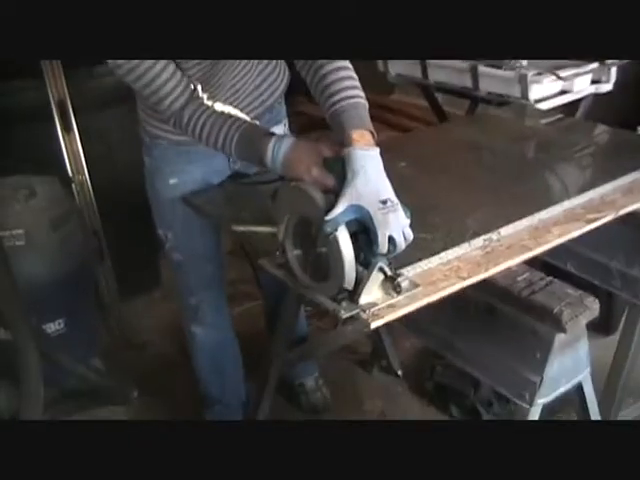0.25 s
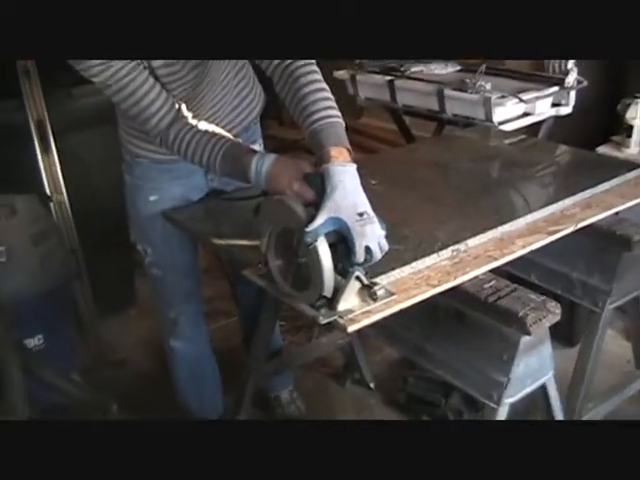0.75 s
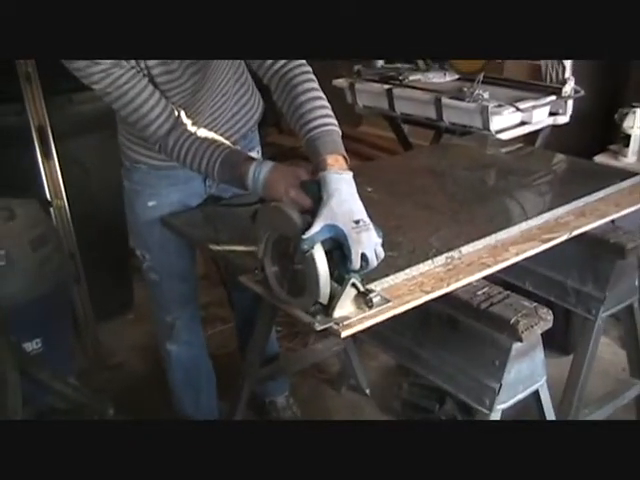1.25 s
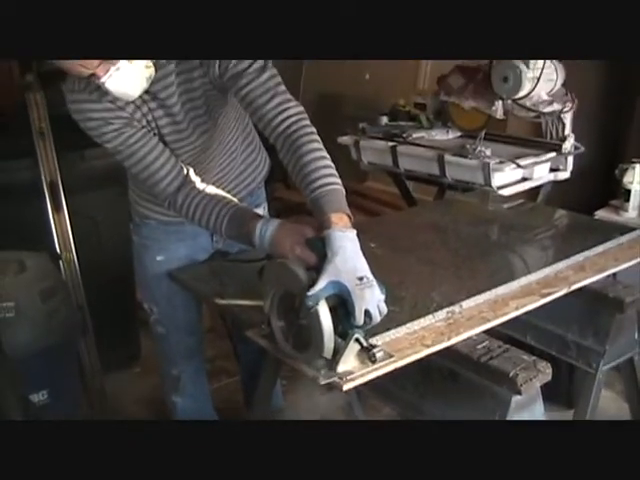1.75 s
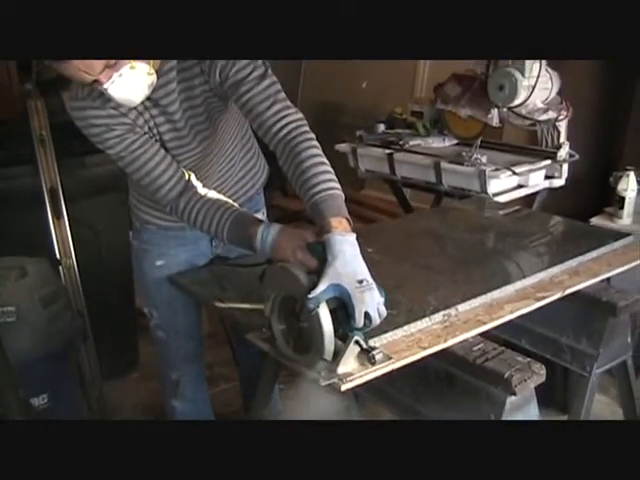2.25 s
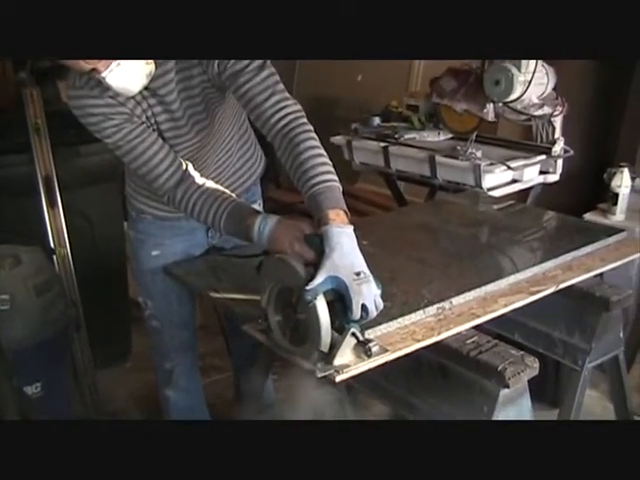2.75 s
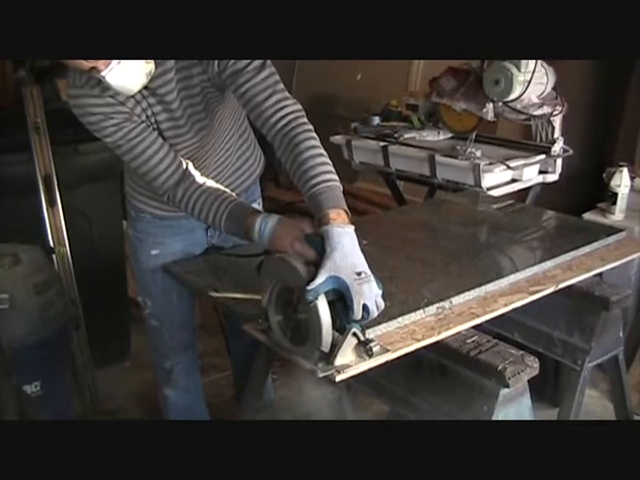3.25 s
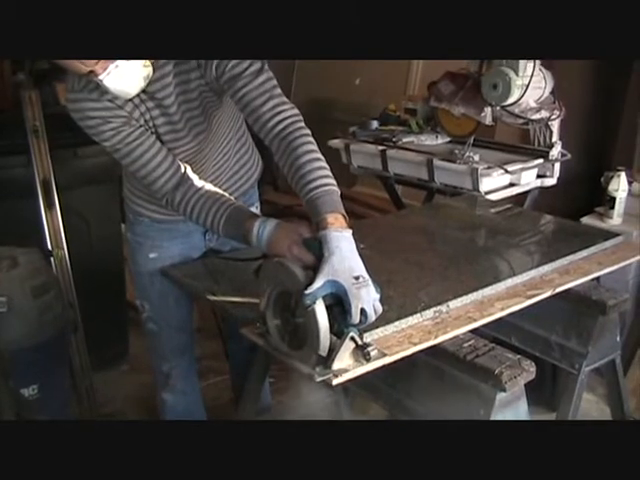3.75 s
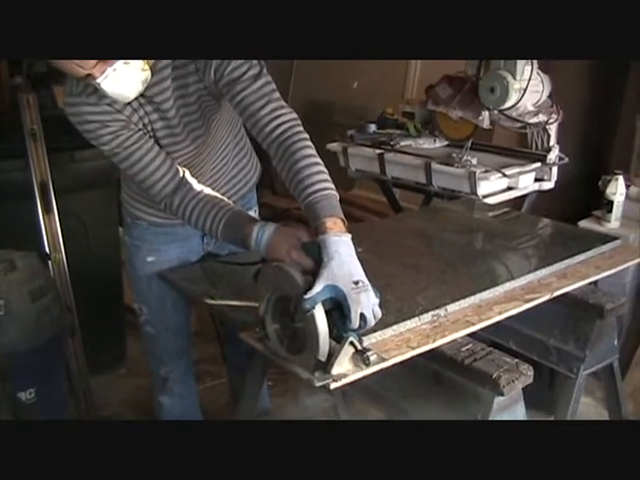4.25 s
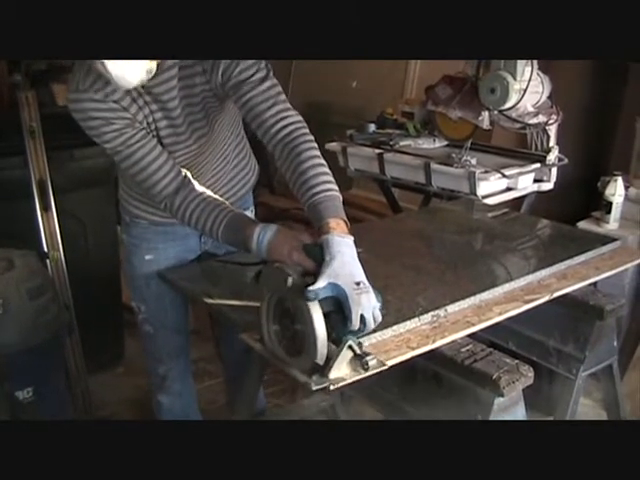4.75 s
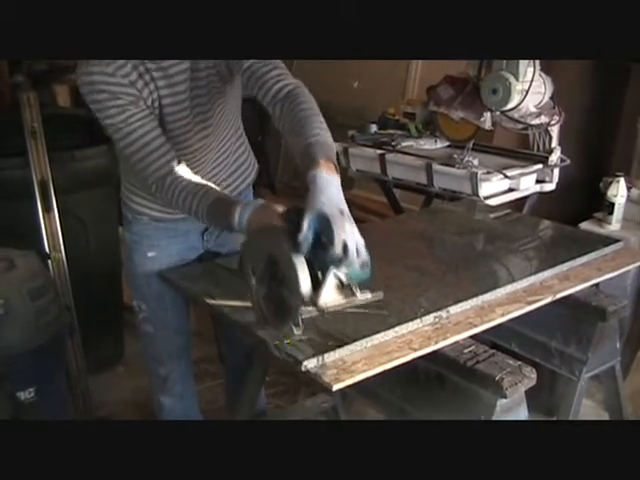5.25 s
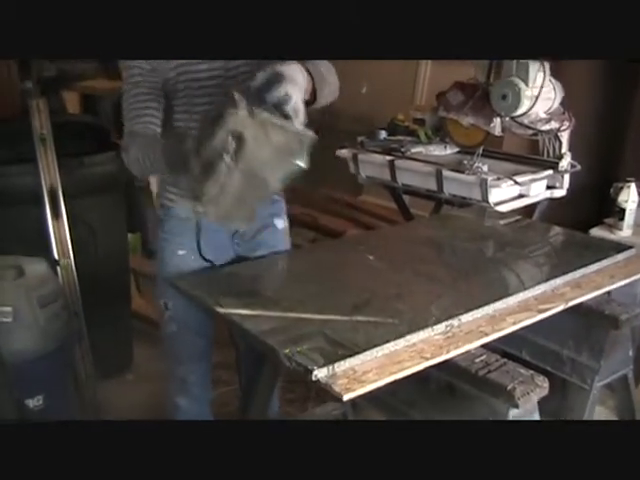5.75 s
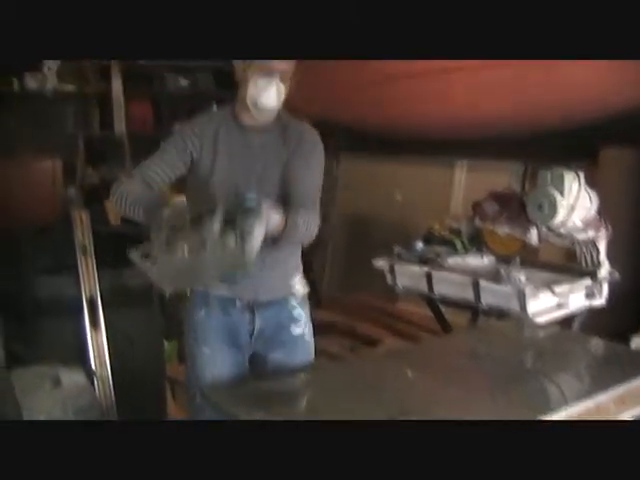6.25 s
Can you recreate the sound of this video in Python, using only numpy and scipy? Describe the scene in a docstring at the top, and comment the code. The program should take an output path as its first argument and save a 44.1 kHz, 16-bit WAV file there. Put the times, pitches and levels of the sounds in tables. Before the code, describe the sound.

In a small workshop, a handheld circular saw jerks on with a growl and a fast-rising whine. Almost at once the rim chips a stone slab, screeches briefly, and settles into a loud, hissing, metallic grind with fluttering rubbing tones. After more than four seconds it breaks through with a couple of knocks, and the motor whine and fan air slide downward. Close, level-controlled stereo pickup.

```python
"""A handheld circular saw spins up, cuts a stone slab for just over four seconds, then coasts down.
The motor whines at multiples of its speed over rushing fan air; grit rings the steel blade, and high
spots on the rim rub the slab in the same order on every turn. Chips, a short screech and knocks mark
the start and end of the cut. A small workshop adds diffuse reflections, and the recorder's gain control
turns the whole sound down while it is loud, so the motor drops back behind the cut."""
import sys
import numpy as np
from scipy import signal
from scipy.fft import rfft, irfft, next_fast_len
from scipy.io import wavfile
from scipy.ndimage import uniform_filter1d

SR = 44100
rng = np.random.default_rng(int(sys.argv[2]) if len(sys.argv) > 2 else 0)


def unload_wav(signal):
    """Save mono or channel-first audio to the path in sys.argv[1] as 16-bit WAV at rate SR, clipped to [-1, 1]."""
    wavfile.write(
        sys.argv[1],
        SR,
        np.round(np.clip(np.atleast_2d(signal).T, -1, 1) * 32767).astype(np.int16),
    )


N = 287532  # samples, about 6.5 seconds
TIME = np.arange(N) / SR
SIZE = 2 * next_fast_len(N * 5 // 8)  # transform length, with spare room for ringing
FREQ = np.maximum(np.arange(SIZE // 2 + 1) * SR / SIZE, 1)  # Hz

FREE_HZ = 382.5  # motor turns per second without load
GEAR_RATIO = 4.335  # motor turns for one turn of the blade
HUM_HZ = 120  # twice the mains frequency
BITE_S = .25  # the rim touches the stone

# Leaning on the saw slows the motor. Each row: time in seconds, speed lost in motor turns per second.
SPEED_LOSS = [(1.89, 0), (2.53, 13.1), (2.84, 12.5), (3.23, 8.9), (4.42, 5.6)]


def saw(speed, turns):
    """Everything that sounds at the slab; the motor drives the blade through a reduction gear."""
    # The rim chips the edge as it enters.
    # Each row: start in seconds, starting level in dB, decay in seconds, centre of the crack in Hz.
    chips = [(.256, -11, .02, 12000), (.272, -11.5, .018, 8000), (.344, -14, .015, 11500)]
    # The blade sings briefly as it wedges into the fresh slot.
    # Each row: start in seconds, starting level in dB, decay in seconds, pitch in Hz.
    screech = [(.33, -22.5, 0.24, 4060), (.35, -35, 0.17, 3740)]
    # The saw's shoe knocks on the slab.
    # Each row: start in seconds, starting level in dB, decay in seconds, centre of the thud in Hz.
    knocks = [(4.827, -10.5, 0.0098, 760), (4.85, -18.5, 0.037, 534), (5.085, -30, 0.031, 192),
              (5.145, -41, 0.082, 199)]
    blade_turns = turns / GEAR_RATIO
    cut = grinding(blade_turns) + rubbing(blade_turns) + drone(turns)
    entry = blows(chips, width=0.55) + blows(screech, width=0.006)
    return motor(speed, turns) + start_up() + entry + cut + blows(knocks, width=1.2)


def motor_speed():
    """Turns per second: spin-up towards free speed, slowing under load, coasting after switch-off."""
    start_hz, spin_up_s = 200.7, .476
    switch_off_s, coast_s = 4.42, 3.93
    driven_s = np.minimum(TIME, switch_off_s)
    free_running = FREE_HZ - (FREE_HZ - start_hz) * np.exp(-driven_s / spin_up_s)
    driven = free_running - curves(SPEED_LOSS)[0]
    return driven * np.exp(-(TIME - driven_s) / coast_s)


def motor(speed, turns):
    """Fan air, and whines locked to the shaft that swell in resonances and are blurred by eddies."""
    # Resonances that the fan whine and its octave sweep through.
    # Each row: centre in Hz, width in Hz, level in dB.
    fan_peaks = [(2030, 120, 1), (2280, 170, -1), (2500, 220, 1.5), (2970, 160, -.5), (4170, 130, -3),
                 (4580, 330, -3), (5560, 230, 4), (6000, 450, -3)]
    # Resonances that the gear whine sweeps through. Each row: centre in Hz, width in Hz, level in dB.
    gear_peaks = [(3100, 400, -9), (3650, 170, -1), (4000, 260, -1.5), (4400, 400, 0)]
    # Weaker motor tones. Each row: multiple of the motor speed, level in dB against the fan air.
    weak_tones = [(1, -35.5), (2, -22), (3, -40), (6, -53), (8, -37), (10, -14), (15, -38), (24, -32),
                  (27, -25)]
    fan_order, gear_order = 9, 12  # fan blades and pinion teeth set these multiples of the motor speed
    octave_order = 2 * fan_order

    # Octaves above (or below) free speed; each octave changes the air's level, rumble and hiss.
    octaves = np.log2(speed / FREE_HZ)
    air_db = -17 + .5 * octaves
    rumble_db = 1.5 * octaves
    hiss_db = 2 + 8.5 * octaves
    air = fan(air_db, rumble_db, hiss_db)

    # Blade wobble makes the fan whine rise and fall twice per blade turn, which adds sidebands.
    wobble = 1 + 0.33 * np.sin(2 * np.pi * 2 * turns / GEAR_RATIO)
    fan_tone = tone(turns, fan_order, flutter=.5) * wobble
    fan_tone = fan_tone + undb(-4) * around(turns, fan_order, width_hz=520)
    octave_tone = tone(turns, octave_order, flutter=1.0) * wobble
    octave_tone = octave_tone + undb(1) * around(turns, octave_order, width_hz=510)
    gear_tone = tone(turns, gear_order, flutter=.15) + undb(-15) * around(turns, gear_order, width_hz=380)

    fan_gain, octave_gain, gear_gain = whine_levels()
    swell = undb(1.4 * walk(14))  # the saw moves in the hands
    fan_whine = fan_tone * fan_gain * swell * resonances(fan_peaks, fan_order * speed, order=2)
    octave_whine = octave_tone * octave_gain * resonances(fan_peaks, octave_order * speed, order=2)
    gear_whine = gear_tone * gear_gain * resonances(gear_peaks, gear_order * speed, order=2)
    weak = sum(undb(db) * tone(turns, multiple, flutter=0.96) for multiple, db in weak_tones)
    return air + fan_whine + octave_whine + gear_whine + weak * undb(air_db)


def whine_levels():
    """Gain of the fan whine, its octave and the gear whine, before their resonances."""
    # Stages of the work: first jerk, spin-up, in the stone, running free. Each row: start in seconds,
    # fan whine in dB, its octave in dB, gear whine in dB.
    stages = [(0, -35, -42, -22), (.15, -22.5, -42, -11.5), (.28, -35, -39, -23.5), (4.67, -21.5, -27, -24)]
    fade_s = 0.062
    starts, *levels = np.transpose(stages)
    stage = np.searchsorted(starts[1:], TIME)
    return [undb(uniform_filter1d(db[stage], int(fade_s * SR))) for db in levels]


def fan(air_db, rumble_db, hiss_db):
    """Cooling air rushes through the housing, with a low rumble and a bright hiss."""
    # Colour of the rushing air. Each row: frequency in Hz, level in dB.
    air_colour = [(40, -46), (90, -31.5), (180, -26.5), (350, -12.5), (520, -6.5), (750, -4), (1100, -2.5),
                  (1600, -2.5), (3200, 1), (4800, -6), (6000, -5), (9000, -7), (12000, -14.5), (15500, -19)]
    # Resonances of the housing. Each row: centre in Hz, width in Hz, level in dB.
    housing = [(297, 40, -8), (552, 66, 1), (1067, 137, 2), (1700, 31, 0.5), (2505, 140, 1.5),
               (3012, 33, 8.5), (5600, 240, -1.5), (6200, 97, -0.5)]
    rush = unit(ring(rng.standard_normal(N), np.hypot(colour(air_colour), resonances(housing))))
    low = signal.sosfiltfilt(signal.butter(2, 800, fs=SR, output="sos"), rush)
    high = signal.sosfiltfilt(signal.butter(2, 4500, "high", fs=SR, output="sos"), rush)
    # Taking one from each gain leaves the band as it is at 0 dB.
    shaped = rush + low * (undb(rumble_db) - 1) + high * (undb(hiss_db) - 1)
    return shaped * undb(air_db + 0.65 * walk(16))


def start_up():
    """The motor current makes the windings hum at twice the mains frequency and the gears growl."""
    # Strength of the motor current. Each row: time in seconds, hum level in dB.
    current = [(0, -31.5), (.12, -33), (.2, -41), (.3, -57.5), (1.4, -50.5), (1.7, -62), (4.4, -68),
               (4.5, -90)]
    # Gears under starting torque. Each row: centre in Hz, width in Hz, level in dB.
    gears = [(700, 120, -6), (980, 90, -2), (1090, 80, 0), (1450, 90, -6)]
    phase = 2 * np.pi * HUM_HZ * TIME
    hum = unit(np.sin(phase) + undb(-3) * np.sin(2 * phase))
    rattle = unit(rng.standard_normal(N) * (1 + 0.36 * np.sin(phase)))
    growl = ring(rattle, resonances(gears) * resonances([(1010, 2500, 0)]))
    return (hum + undb(13.5) * growl) * undb(curves(current)[0])


def grinding(blade_turns):
    """Grit cracks off in dense clicks, pulsing with wobble and torque; it rings the blade and hisses."""
    # Ringing of the steel blade. Each row: centre in Hz, width in Hz, level in dB.
    blade = [(2258, 51, -7.4), (3060, 60, -3.5), (3399, 16, -4.1), (3742, 16, -3.0), (4032, 50, -5.8),
             (4480, 95, -7.7), (5021, 32, -3.9), (5664, 34, -4.5), (5929, 44, -5.0), (6129, 114, -5.5),
             (6469, 65, -7.7), (6818, 26, -6.7), (6932, 72, -4.9), (7353, 73, -0.8), (7786, 31, -6.0),
             (8368, 53, 0.0), (8691, 46, -0.5), (9086, 48, -4.5), (9764, 63, -5.8), (9890, 21, 0.6),
             (10108, 22, -0.4), (10488, 21, -8.5), (11505, 102, -9.1), (11915, 34, -9.7),
             (12081, 38, -12.1), (12386, 29, -9.1), (12580, 52, -10.8), (13220, 115, -6.3),
             (14223, 58, -11.9), (14936, 107, -12.8)]
    # Colour of the dust's hiss. Each row: frequency in Hz, level in dB.
    dust = [(500, -42), (1500, -5.5), (2200, -47), (3500, 3), (5200, -36), (7000, 2.5), (10000, 9),
            (11100, 4.5), (13000, 2), (15500, -34)]
    wobble = 1 + 0.08 * np.sin(2 * np.pi * blade_turns)
    torque = 1 + 0.05 * np.sin(2 * np.pi * HUM_HZ * TIME)
    # Most grains are weak, a few are up to 15 dB stronger.
    grains = rng.standard_normal(N) * undb(3 * np.minimum(rng.exponential(size=N), 5))
    grit = unit(grains * wobble * torque * undb(0.54 * walk(30.24)))
    # The level is unsteady while the cut is shallow.
    level_db = -8 - 2.5 * shallowness() * walk(24.7)
    body = np.hypot(resonances(blade), undb(-24.5) * colour(dust))
    radiation = FREQ ** 2 / (FREQ ** 2 + 900 ** 2)  # a thin disc radiates little bass
    return ring(grit * contact() * undb(level_db), body * radiation)


def rubbing(blade_turns):
    """High spots on the rim strike the slab in the same order on every turn, mixed with loose scraping."""
    # Low ringing of the slab on its bench. Each row: centre in Hz, width in Hz, level in dB.
    slab_low = [(554, 20, -33.5), (750, 25, 3), (815, 70, 8), (870, 8, 4.5)]
    # Upper ringing of the slab. Each row: centre in Hz, width in Hz, level in dB.
    slab_high = [(1134, 57, 8.5), (1248, 16, 6.5), (1308, 34, 1.5), (1582, 11, 9.5), (1754, 60, -10.5),
                 (2263, 26, -7)]
    # The rim binds in the slot and the slab's balance and loudness change.
    # Each row: start in seconds, end in seconds, change of the low ringing in dB, of the upper in dB.
    binds = [(.45, .92, 3.5, 0), (1.135, 1.36, 2.5, 2), (2.1, 2.65, 3, 1), (3.186, 4.536, -1.5, 3)]
    bind_fade_s = 0.068
    # Multiples of the blade speed with fixed random phases form one pattern that repeats every turn.
    spots = sum(np.cos(2 * np.pi * (k * blade_turns + rng.random())) for k in np.arange(28) + 1)
    scrape = ring(rng.standard_normal(N), resonances([(1200, 2200, 0)]))
    push = unit(spots) * (1 + 0.076 * walk(29.48)) + 0.96 * scrape

    low_db, high_db = -26.5, -20.5  # outside the binding
    for start, end, low_change_db, high_change_db in binds:
        bind = np.clip(.5 + np.minimum(TIME - start, end - TIME) / bind_fade_s, 0, 1)
        low_db = low_db + bind * low_change_db
        high_db = high_db + bind * high_change_db
    # Both parts also swell as the rim shifts in the slot.
    swell_db, swell_hz = 1.2, 5
    low = even(ring(push, resonances(slab_low)), seconds=0.55) * undb(low_db + swell_db * walk(swell_hz))
    high = even(ring(push, resonances(slab_high)), seconds=0.12) * undb(high_db + swell_db * walk(swell_hz))
    return contact() * (low + high)


def drone(turns):
    """Unbalance of blade and shaft shakes the slab; the blade's part grows as pressing slows the motor."""
    # Drone of the blade. Each row: multiple of its turning rate, level in dB without speed loss,
    # rise in dB for each motor turn per second lost.
    blade_drone = [(1, -64, 0), (2, -53, .55), (3, -49, .1), (4, -52, 1.0)]
    lost_hz = curves(SPEED_LOSS)[0]
    blade = 0
    for multiple, db, rise in blade_drone:
        blade = blade + tone(turns / GEAR_RATIO, multiple, flutter=0.45) * undb(db + rise * lost_hz)
    shaft = tone(turns, order=1, flutter=0.1) * undb(-41)
    return contact() * (blade + shaft)


def shallowness():
    """One as the rim touches the stone, fading towards zero as it sinks to full depth."""
    sink_s = .44
    return np.exp(-np.maximum(TIME - BITE_S, 0) / sink_s)


def contact():
    """How firmly the rim engages the stone, as a gain: one at full depth."""
    break_s, break_db = 4.52, -4  # the rim breaks through the far edge
    exit_s, exit_db_per_s = 4.67, 153  # the rim leaves the stone and the cut dies away
    leaving_db = break_db * (TIME > break_s) - exit_db_per_s * np.maximum(TIME - exit_s, 0)
    return (TIME > BITE_S) * undb(-15.5 * shallowness() + leaving_db)


def blows(events, width):
    """Short noise bursts start sharply and die away; width is their bandwidth as a share of the centre."""
    out = 0
    for start, db, decay, hz in events:
        force = undb(db) * (TIME >= start) * np.exp(-np.abs(TIME - start) / decay)
        out = out + ring(force * rng.standard_normal(N), resonances([(hz, width * hz, 0)]) ** 2)
    return out


def tone(turns, order, flutter):
    """One multiple of a rotation: a steady part and a fluttering part."""
    steady = np.sqrt(2) * np.sin(2 * np.pi * (order * turns + rng.random()))
    return unit(steady + flutter * around(turns, order, width_hz=80))


def around(turns, order, width_hz):
    """A narrow band of noise that follows one multiple of a rotation."""
    wander = walk(width_hz) + 1j * walk(width_hz)
    return unit(np.real(wander * np.exp(2j * np.pi * order * turns)))


def ring(x, gain):
    """Filter that never sounds ahead of a push and keeps white noise's power; resonances ring after it."""
    # Folding the log gain into positive time gives the filter with the earliest possible response.
    cepstrum = irfft(np.log(unit(gain) + 1e-9))[:SIZE // 2]
    cepstrum[0] /= 2
    response = np.exp(2 * rfft(cepstrum, SIZE))
    return irfft(rfft(x, SIZE) * response)[:N]


def resonances(modes, at=FREQ, order=1):
    """Gain of a body with (Hz, width Hz, dB) modes; a higher order has steeper flanks."""
    power = 0
    for hz, width, db in modes:
        offset = (at - hz * hz / at) / width
        power = power + undb(db) ** 2 / (1 + offset ** 2) ** order
    return np.sqrt(power)


def colour(points):
    """Gain at each frequency from (Hz, dB) points."""
    hz, db = np.transpose(points)
    return undb(np.interp(np.log(FREQ), np.log(hz), db))


def walk(hz):
    """Smooth random wandering with an rms of one, from hz new random values per second."""
    step = max(int(SR / hz), 2)
    held = np.repeat(rng.standard_normal(N // step + 1), step)
    return unit(uniform_filter1d(uniform_filter1d(held, step), step)[:N])


def curves(table):
    """Each column of a table, joined by straight lines in time."""
    seconds, *columns = np.transpose(table)
    return [np.interp(TIME, seconds, column) for column in columns]


def even(x, seconds):
    """Scale to a running rms of one."""
    return x / np.sqrt(uniform_filter1d(x ** 2, int(seconds * SR)) + 1e-12)


def unit(x):
    """Scale to an rms of one."""
    return x / np.sqrt(np.mean(x ** 2))


def undb(db):
    """Decibels to gain."""
    return 10 ** (np.asarray(db) / 20)


def workshop(speed, turns):
    """Diffuse reflections: the saw again with fresh random draws, coloured by the room."""
    # Reflections against the direct sound. Each row: frequency in Hz, level in dB.
    room = [(60, -18), (400, -16.5), (1100, -13), (2500, -8), (5000, -8), (8500, -8.5), (13000, -4.5)]
    return irfft(rfft(saw(speed, turns), SIZE) * colour(room))[:N]


def gain_control(x):
    """Turns down as the averaged level rises, and comes back up no faster than a steady rate."""
    threshold_db, ratio = -15.5, 90
    detect_s, recover_db_per_s = 0.15, 28
    follow = np.exp(-1 / (detect_s * SR))
    power = signal.lfilter([1 - follow], [1, -follow], np.mean(x ** 2, axis=0))
    level_db = 10 * np.log10(power + 1e-12)
    # Hold each peak, but let it sink at the recovery rate.
    recovery_db = recover_db_per_s * TIME
    held_db = np.maximum.accumulate(level_db + recovery_db) - recovery_db
    return x * undb(-np.maximum(held_db - threshold_db, 0) * (1 - 1 / ratio))


def scene(right_db=0.4):
    """The saw is nearly centred; reflections have opposite signs left and right, so they sound wide."""
    speed = motor_speed() * (1 + 0.00061 * walk(12))
    turns = np.cumsum(speed) / SR
    direct = saw(speed, turns)
    walls = workshop(speed, turns)
    left = (direct + walls) * undb(-right_db / 2)
    right = (direct - walls) * undb(right_db / 2)
    return np.array([left, right])


def record(dry):
    """The recorder evens out the level, rounds the highest peaks and cuts the top."""
    rounded = np.tanh(.6 * gain_control(dry)) / .6
    top_hz = 15700
    return signal.sosfilt(signal.ellip(14, .2, 90, top_hz, fs=SR, output="sos"), rounded)


dry = scene()
out = record(dry)
unload_wav(out)
```